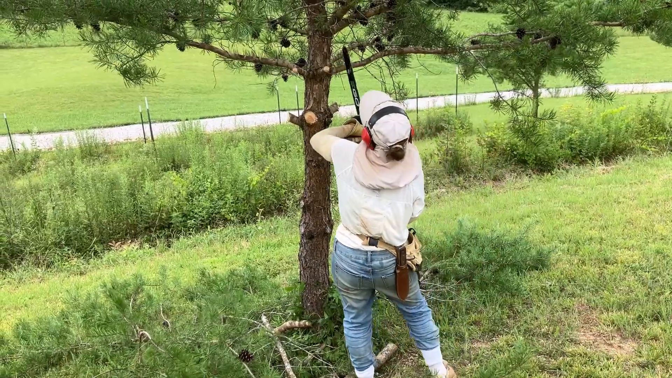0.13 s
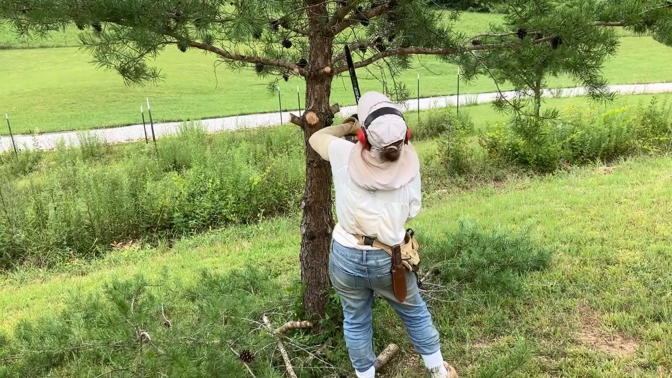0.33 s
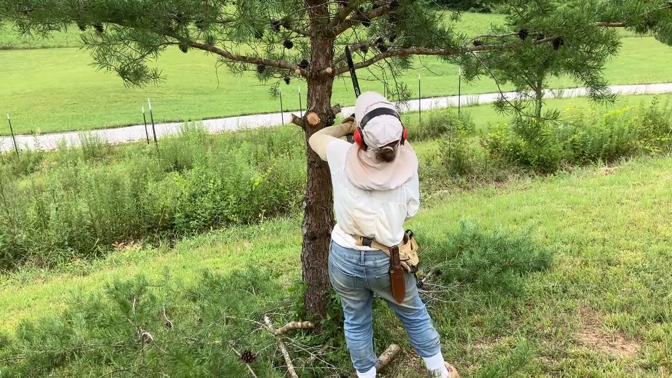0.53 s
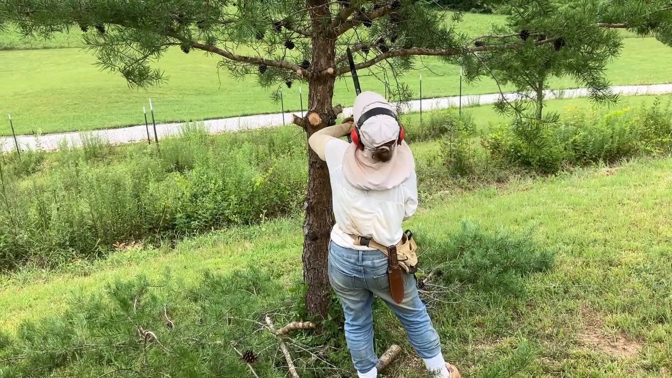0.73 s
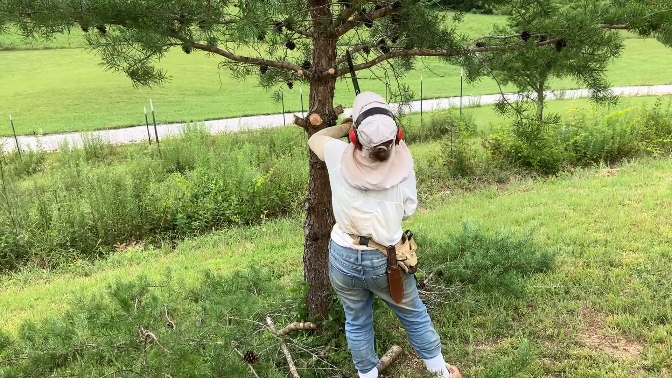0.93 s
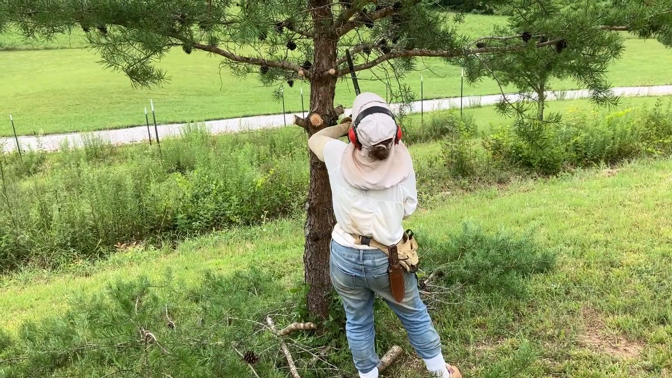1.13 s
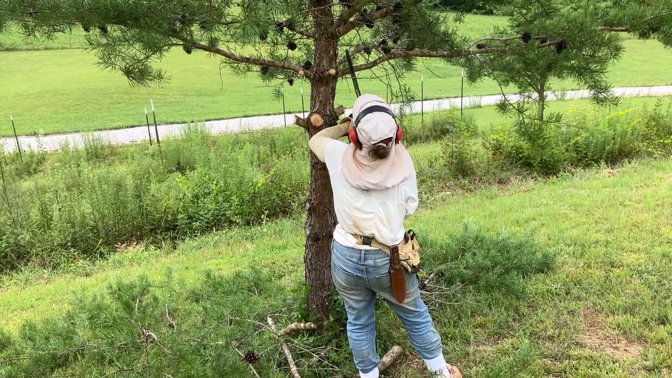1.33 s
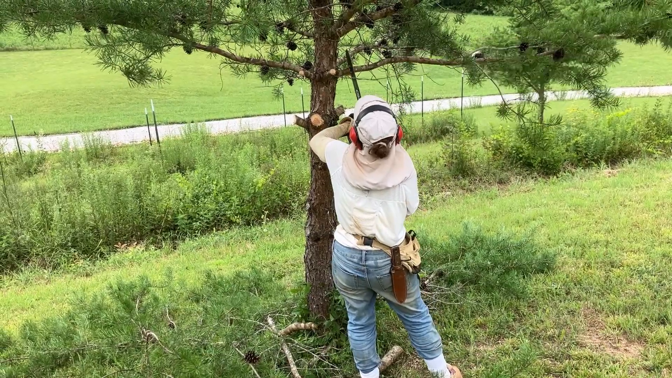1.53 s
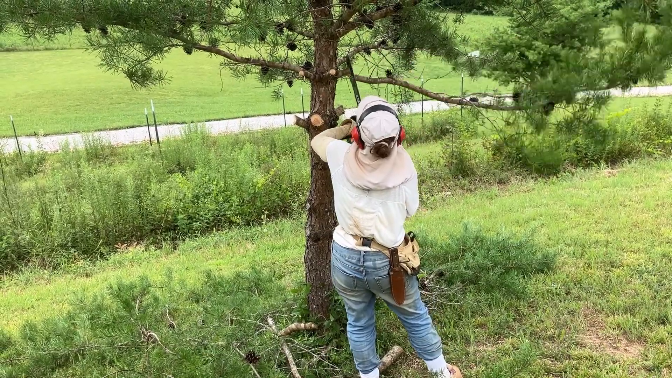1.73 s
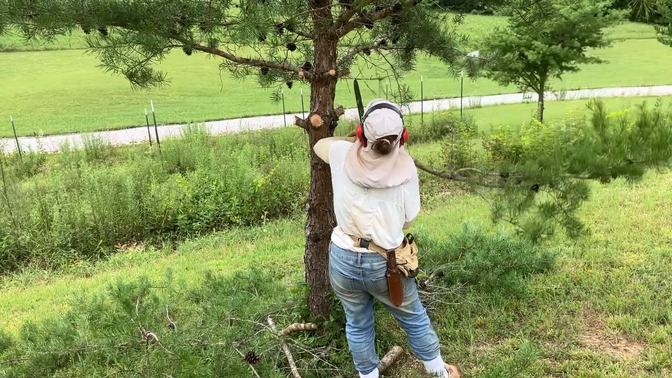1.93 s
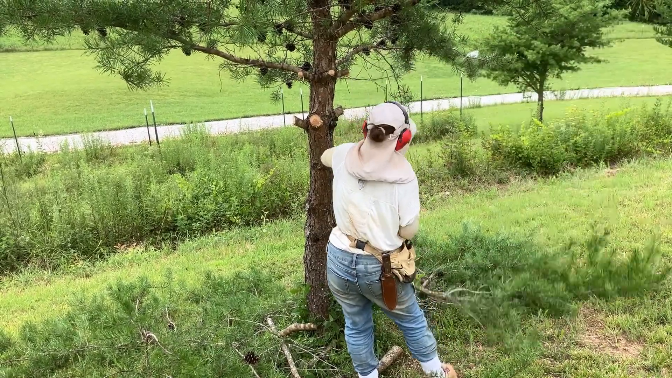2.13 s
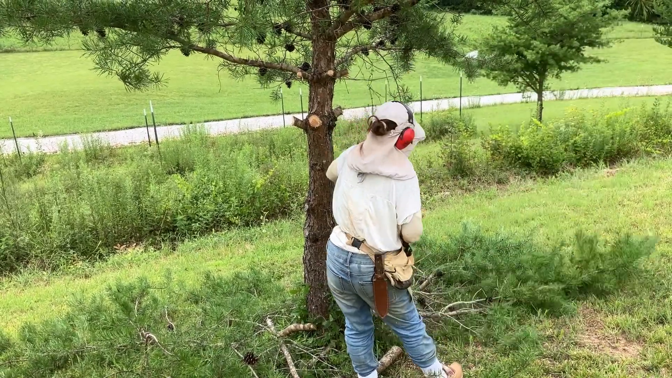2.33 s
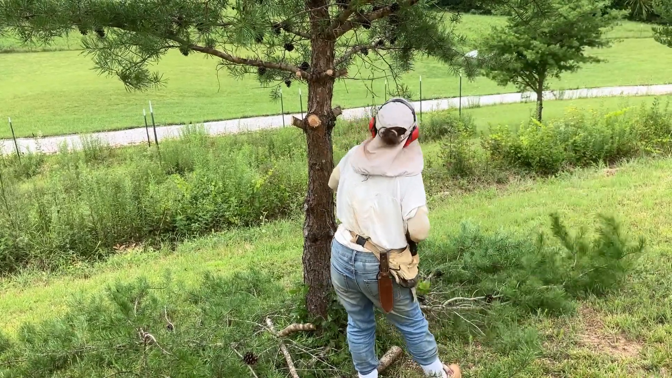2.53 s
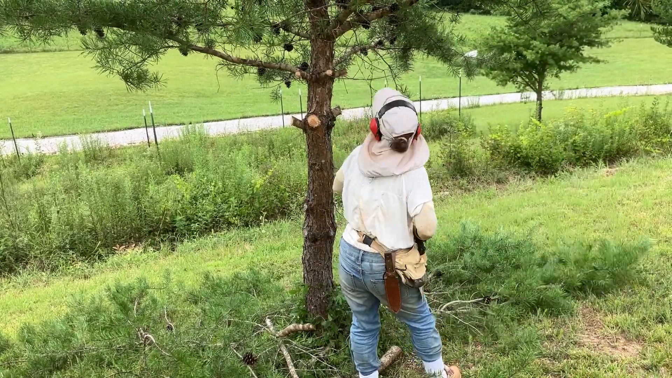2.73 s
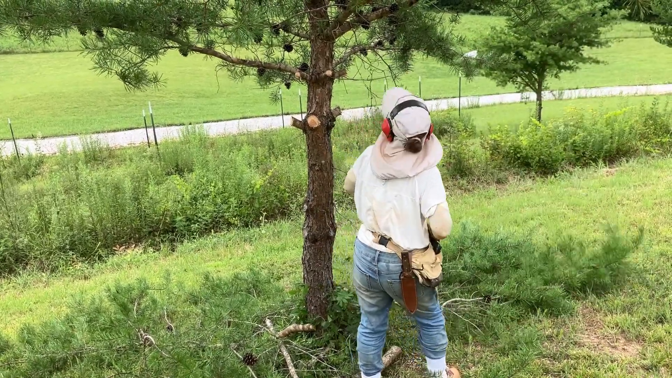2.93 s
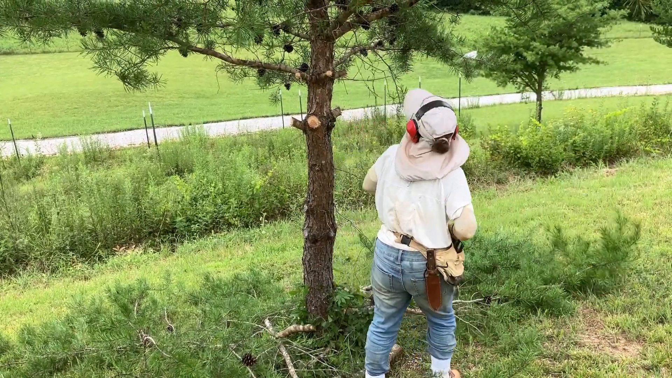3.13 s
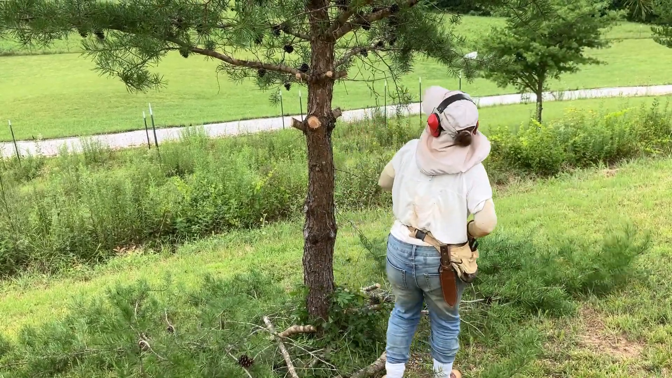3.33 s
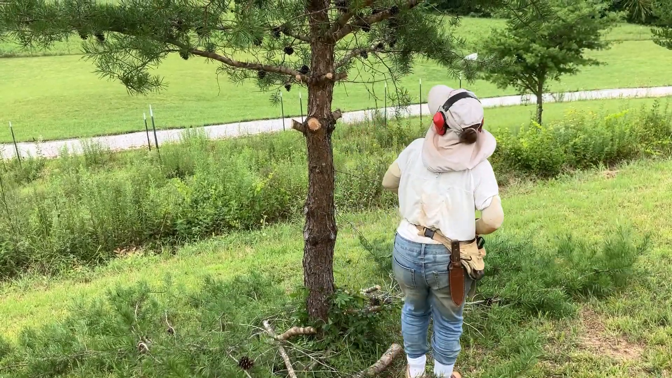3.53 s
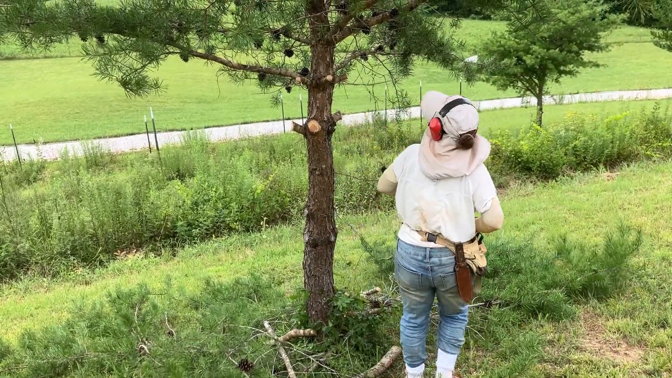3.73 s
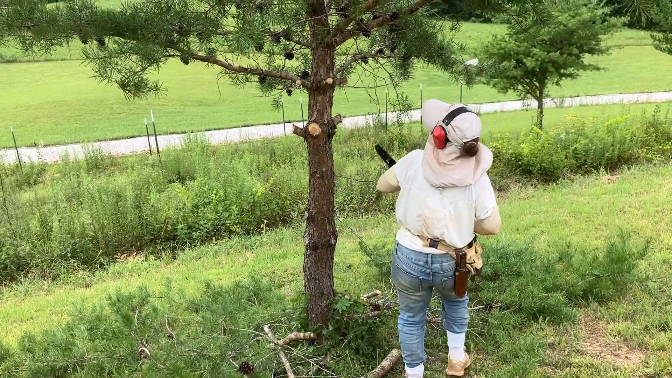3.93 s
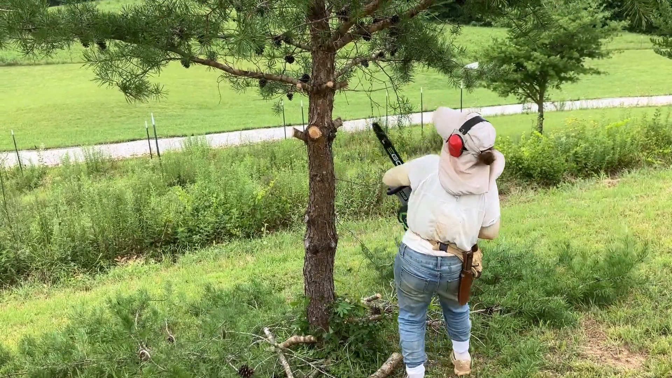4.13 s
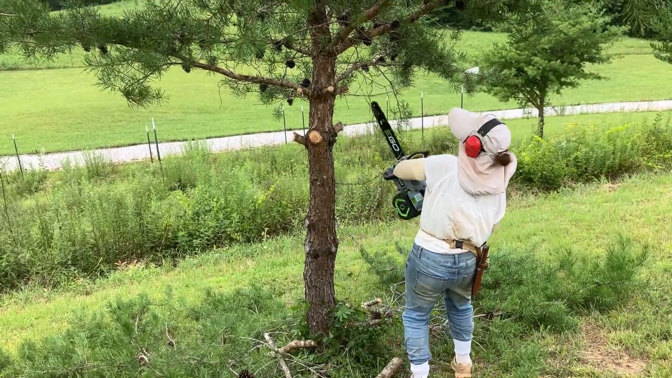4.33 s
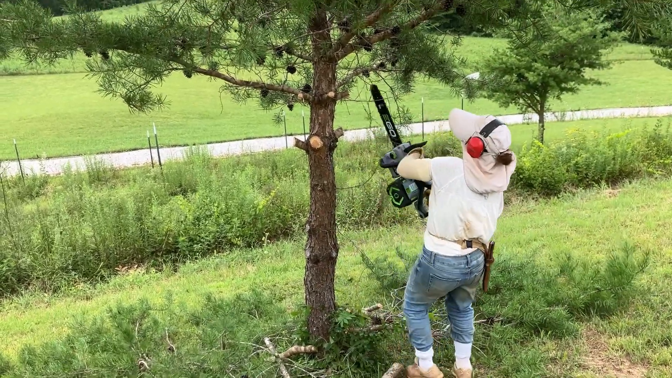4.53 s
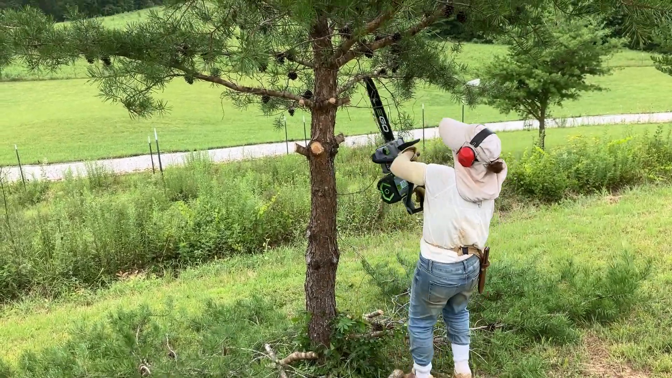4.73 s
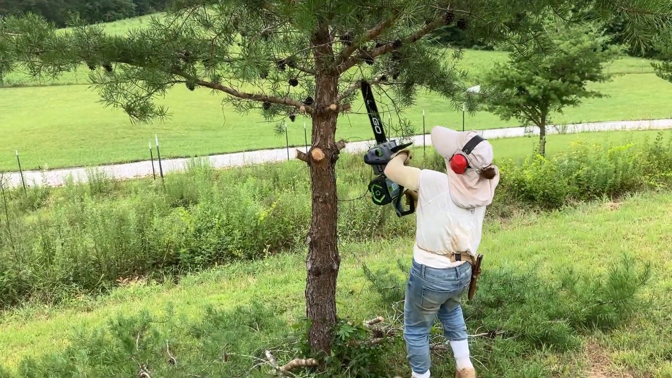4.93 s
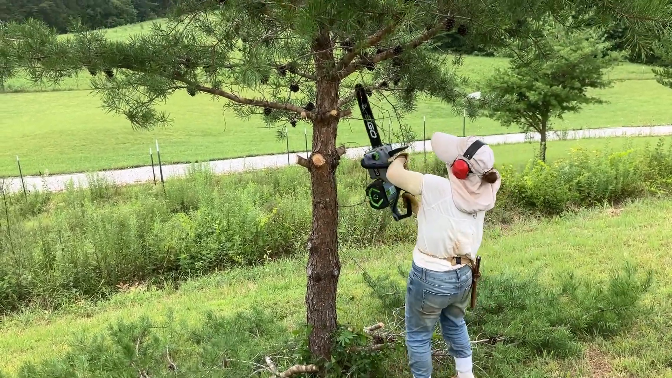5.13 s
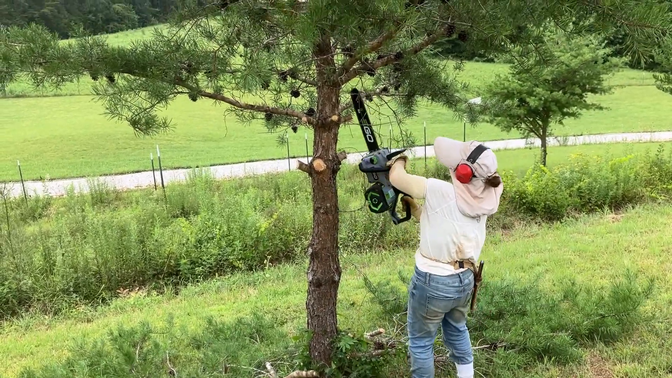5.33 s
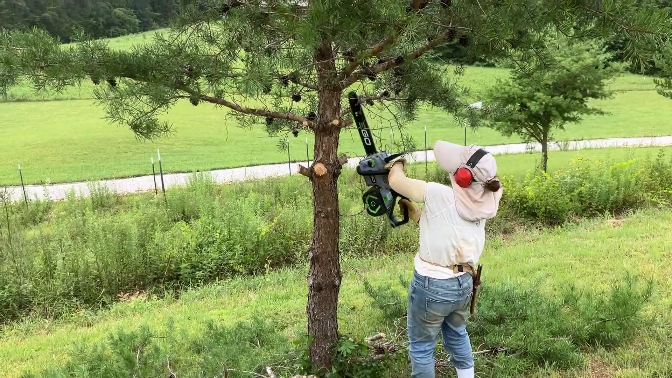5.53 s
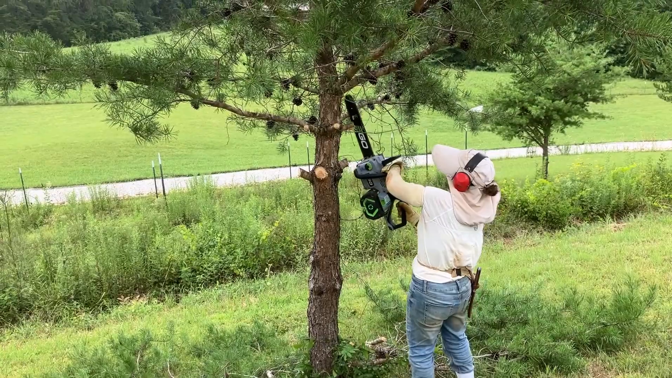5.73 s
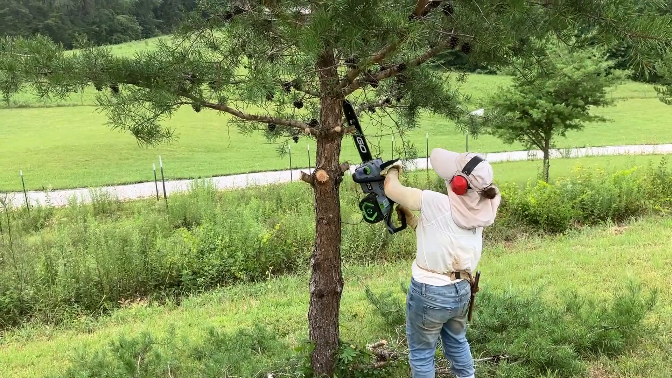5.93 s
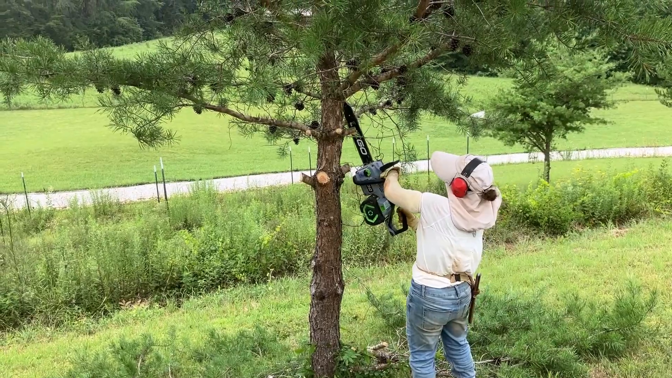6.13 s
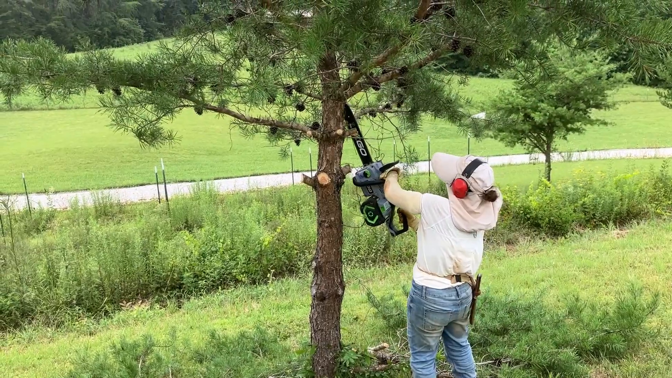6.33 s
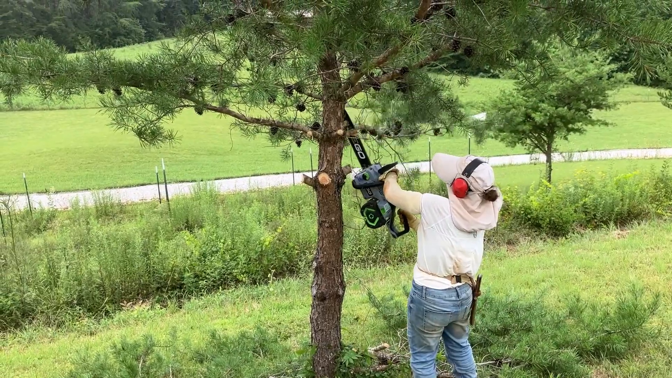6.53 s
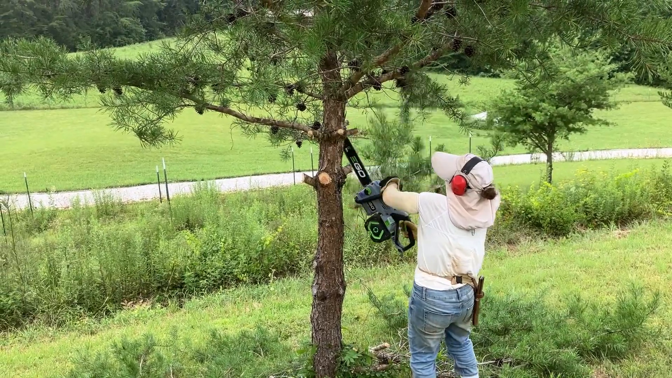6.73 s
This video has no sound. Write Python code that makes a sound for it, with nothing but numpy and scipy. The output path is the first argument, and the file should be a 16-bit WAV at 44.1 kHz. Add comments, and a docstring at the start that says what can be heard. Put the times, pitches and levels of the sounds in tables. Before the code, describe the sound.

Outdoors, an electric chainsaw runs up and cuts, stops abruptly; foliage crashes, twigs crack, the camera is bumped, then the saw whines again.

```python
"""In a quiet field a cordless chainsaw trims a small pine, a few metres from a hand-held camera.
The saw runs up, cuts a branch and brakes; the branch swishes into the grass, twigs snap, a second cut follows.
Chain links striking a six-tooth sprocket make the whine, in swept harmonics coloured by the housing; motor
and chain add other lines. Grains of noise pulsing with the sprocket make clatter, rasp and hiss. Shaped
noise makes air, foliage, twigs and echo; sinking sines make the bumps on the camera."""
import sys
import numpy as np
from scipy import signal
from scipy.fft import rfft, irfft
from scipy.io import wavfile

SR = 44100
rng = np.random.default_rng(int(sys.argv[2]) if len(sys.argv) > 2 else 0)


def digitize_waveform(pressure):
    """Quantize a signal to 16-bit integers and store it at the path in sys.argv[1].

    Rows of a 2-D input are taken as channels; values are limited to [-1, 1].
    """
    field = np.atleast_2d(pressure).T
    bounded = np.clip(field, -1, 1)
    quanta = np.round(bounded * 32767).astype(np.int16)
    wavfile.write(sys.argv[1], SR, quanta)


N = 298998
TIME = np.arange(N) / SR  # s
FREQS = np.fft.rfftfreq(N, 1 / SR)  # Hz

# Colour of the field's air. Each row: frequency in Hz, relative level in dB per Hz.
FIELD_COLOUR = [(18, -35.5), (30, -10.5), (270, -0.5), (432, -9.5), (673, -6.5), (1080, -18.5),
                (3070, -23.5), (5450, -34), (8060, -21), (9190, -21.5), (10700, -27.5), (13600, -33.5),
                (15500, -47.5)]
FIELD_DB = -66
# Colour of the grip rumble. Each row: frequency in Hz, relative level in dB per Hz.
RUMBLE_COLOUR = [(20, -22), (45, -1), (100, -5), (170, -18), (400, -35), (1500, -62)]
# The hand shifts its grip. Each row: peak time in s, rumble level in dB, rise in s, fade in s (both over 20 dB).
GRIP_SHIFTS = [(2.54, -45.5, .2, 0.37), (2.87, -51, 0.077, 0.15), (3.05, -54.5, .07, .17),
               (3.45, -49, 0.19, 0.2534), (3.99, -53.5, .07, 0.2), (4.18, -64, .07, 0.2),
               (4.42, -60.5, .06, .14), (4.69, -66, .1, 0.374)]
# Soft bumps on the camera. Each row: start in s, envelope peak in dB, starting pitch in Hz.
CAMERA_BUMPS = [(2.426, -40, 55), (2.495, -28.5, 176), (2.508, -29, 69.5), (2.514, -28.5, 148),
                (2.535, -26, 85.94), (2.592, -40, 554), (2.854, -43.5, 60), (2.878, -33.5, 188.5),
                (3.457, -35, 132.4), (3.569, -45, 90), (3.975, -48, 130)]
# Colour of brushing needles. Each row: frequency in Hz, relative level in dB per Hz.
NEEDLE_COLOUR = [(150, 21.5), (700, -33), (1500, -14), (3000, 5), (5500, 8.5), (8000, 12.5), (11000, 10),
                 (15500, 2.5)]
# Colour of dry sticks. Each row: frequency in Hz, relative level in dB per Hz.
STICK_COLOUR = [(200, -8.5), (700, 5), (1400, -5), (2600, 1.5), (5000, -23), (12000, -35)]
# Swishes of needles and grass, the first from the falling branch.
# Each row: peak time in s, relative level in dB, rise in s, fade in s (both over 20 dB).
FOLIAGE_SWISHES = [(2.275, -38, 0.043, 0.12), (2.35, -48.5, .04, 0.1), (2.5, -63.5, 0.1846, 1.3),
                   (2.968, -64, .01, 0.0597), (3.27, -61.5, .06, .3), (3.41, -59, 0.05685, 0.1754),
                   (3.55, -59.5, .1, 0.1108), (3.65, -64, .03, .11), (3.82, -62.5, 0.098, 0.3112),
                   (4.0, -66, .04, .06), (4.19, -68, 0.0209, 0.1), (4.33, -73, .08, 1),
                   (4.465, -63.5, .1, 0.2726), (4.6, -69, 0.2029, .6)]
# Snapping twigs. Each row: start in s, relative level in dB, weight of the woody knock in dB.
TWIG_SNAPS = [(2.2358, -29, -17), (2.2644, -29, -17), (2.2734, -30, -22), (2.2824, -27, -16),
              (2.3344, -29, -6), (2.3466, -32, -14), (2.823, -39.5, -18), (2.9644, -57.5, -15),
              (3.3319, -37.5, 0), (3.4121, -48, -11), (3.5225, -42, 0), (3.5697, -38.5, -20),
              (3.6232, -45, -20), (3.6358, -30.5, -5.5), (4.1854, -52.5, 10), (4.2264, -41, -22),
              (4.3294, -59.5, 13), (4.4667, -35, -6), (4.5373, -50.5, 9)]

# The bar scraping the kerf as the branch sags. Each row: time in s, level in dB.
SCRAPE_LEVEL = [(1.581, -57.5), (1.609, -30.5), (1.7, -31), (1.78, -38.5), (1.82, -56)]
# Resonances of that scrape. Each row: frequency in Hz, relative level in dB per Hz.
KERF_COLOUR = [(2500, -23.5), (3300, -12), (3700, -7.5), (4100, -6), (4600, -13), (6500, -30.5)]
# The chain taking up slack or catching in wood. Each row: start in s, relative level in dB, T60 in s.
CHAIN_JOLTS = [(1.093, -18.5, 0.09), (1.532, -17.5, 0.098), (1.685, -19.5, 0.16), (4.717, -26.5, 0.099),
               (4.765, -33, .05), (4.787, -28, 0.129)]

# How hard the cutters bite into wood. Each row: time in s, bite from 0 to 1.
BITE_CURVE = [(.9, 0), (1.1, .55), (1.4, 0.8), (1.7, .95), (1.85, .1), (2.1, 0), (4.75, 0.13), (5.05, 0.09),
              (5.75, 0.1), (6.05, 0.77), (6.45, 1), (6.78, .8)]
# Motor speed in each cut: run-up, sags as cutters catch, climbs as wood gives.
# Each row: time in s, sprocket turns per s.
SPEED_CURVE_1 = [(0, 42), (.06, 59), (.165, 102), (.21, 107), (.4, 109), (1.06, 109.6), (1.11, 107.5),
                 (1.2, 109.5), (1.45, 109.6), (1.6, 111.1), (1.69, 109), (1.86, 116), (1.99, 116),
                 (2.09, 100), (2.14, 60), (2.175, 47), (2.24, 20)]
SPEED_CURVE_2 = [(4.69, 15), (4.85, 57), (5.02, 126.5), (5.09, 132.1), (5.68, 132.2), (6.02, 137.4),
                 (6.11, 135.4), (6.2, 139.3), (6.32, 137.7), (6.45, 139.6), (6.58, 138), (6.66, 143.6),
                 (6.78, 143.8)]
# Weaker lines of motor and chain. Each row: multiple of sprocket speed, relative level in dB.
MOTOR_LINES_1 = [(2, -29.5), (3, -13.5), (5, -10), (7, -13.5), (8, -19), (9, -16.5), (11, -12), (13, -22.5),
                 (15, -14.5), (17, -21.5)]
MOTOR_LINES_2 = [(2, -20.5), (3, -21), (4, -14.5), (5, -6.5), (7, -31.5), (9, -17), (10, -9.5), (11, -12.5),
                 (14, -20.5), (23, -17), (37, -14.5), (42, -15.5), (60, -13.5)]
# Harmonics of the tooth rate, from the first up, in each cut.
# Each row: relative level in dB, drift in dB per s as the saw is tilted.
TOOTH_HARMONICS_1 = [(-31, 4), (-27, -3), (-40, 1), (-38, -4.5)]
TOOTH_HARMONICS_2 = [(-22.5, -0.3), (-28.5, -1.2), (-36, 1), (-40, 0.055)]
# How bar and housing radiate the whine towards the camera. Each row: frequency in Hz, gain in dB.
HOUSING_RADIATION_1 = [(190, -29.5), (270, -11), (340, -5.5), (420, -14.5), (560, -10), (650, -7.5),
                       (700, -1.5), (950, -8), (1130, -10.5), (1220, -2), (1300, 1), (1420, -2),
                       (1700, -13.5), (2080, -10.5), (2370, -20), (2600, -4), (2800, -11.5)]
HOUSING_RADIATION_2 = [(170, -50), (300, -13.5), (465, -17), (560, -8), (735, 2), (790, 2.5), (950, -5),
                       (1130, -7), (1350, 2), (1590, -11), (2240, -10), (2440, -21.5), (2580, -2.5),
                       (2950, -14), (3170, -2), (3320, -11), (3460, -4)]
# Clatter of bar and housing. Each row: frequency in Hz, relative level in dB per Hz.
CLATTER_COLOUR_1 = [(25, -29), (80, -13), (170, -20.5), (290, -2.5), (450, -8.5), (560, 2.5), (720, 1),
                    (950, -4), (1250, 2), (1520, -8), (1800, -3), (4000, -45.5)]
CLATTER_COLOUR_2 = [(25, -37.5), (90, -15), (175, -25.5), (260, -10.5), (350, -5.5), (450, -18), (700, 5),
                    (950, -3), (1300, 0.5), (1680, -13), (1850, -12), (4000, -19)]
# Rasp of the cutters. Each row: frequency in Hz, relative level in dB per Hz.
RASP_COLOUR_1 = [(2000, -8.5), (2300, 3.5), (2600, -1), (2800, -1.5), (3100, 0.5), (3500, -2.5),
                 (3800, -12), (4050, -16.5), (8000, -8)]
RASP_COLOUR_2 = [(1900, 7), (2200, -0.5), (2600, 10), (2850, 1.5), (3150, 9), (3400, -12), (3600, 1),
                 (3800, -23), (4100, -9), (8000, -21)]
# Hiss of the links. Each row: frequency in Hz, relative level in dB per Hz.
HISS_COLOUR_1 = [(2500, -30), (4100, -7.1), (4400, -9.8), (5000, -8.4), (6500, -11.4), (7400, -7.2),
                 (8400, 0.0), (9800, -2.4), (11400, -2.7), (13000, -4.2), (14900, -5.8)]
HISS_COLOUR_2 = [(2500, -30), (4100, -3.3), (4400, -6.0), (5000, -2.6), (6500, -5.7), (7400, -5.1),
                 (8400, 0.0), (9800, -2.1), (11400, -0.9), (13000, -3.3), (14900, -3.7)]

# Likeness of the two microphone ports. Each row: frequency in Hz, likeness from 0 to 1.
PORT_LIKENESS = [(100, 0.71), (700, 0.71), (1800, 0.92), (3000, 0.2), (5000, 0.64), (7000, 0.24),
                 (9000, 0.95), (11000, 1), (15000, 0.76)]
# Phase lead of the left port. Each row: frequency in Hz, lead in radians.
PORT_LEAD = [(0, 0), (2000, .1), (2800, 1.5), (3400, .9), (4000, 1.3), (4700, 2.4), (6100, 2.2), (6700, .1),
             (9100, -3.1), (15800, -12.7)]
EDGE_HZ = 15900  # upper limit of the camera's sound

TEETH, LAP = 6, 8  # sprocket teeth; sprocket turns in one lap of the chain
FULL_SPEED = 120  # sprocket turns per s at which the speed laws give no gain
RUN_1, RUN_2 = (-.05, 2.143), (4.728, 6.9)  # the chain runs from, to, in s
ATTACK_DB_PER_S, RELEASE_DB_PER_S = 850, 338
# How each layer grows: dB per doubling of speed, dB at full bite.
CLATTER_LAW, RASP_LAW, HISS_LAW = (1.6, 3.1), (4.8, 2.7), (7.1, 0.76)
WHINE_LAW, HUM_LAW = (3.3, -0.91), (16.7, 0)
# Bands in Hz over which clatter, rasp and hiss are levelled.
LOW_BAND, RASP_BAND, HISS_BAND = (850, 1150), (1700, 4000), (7000, 15500)
SLACK_SHIMMER = .15  # scales how much a slow, slack chain makes the whine waver


def gain_of(db):
    """Decibels to linear gain."""
    return 10 ** (np.asarray(db) / 20)


def evened(x):
    """Scales a signal to unit RMS."""
    return x / np.sqrt(np.mean(x ** 2) + 1e-20)


def read(points):
    """A table over frequency, joined on a log axis."""
    f, value = np.transpose(points)
    return np.interp(np.log(FREQS + 1), np.log(f + 1), value)


def level(s, db):
    """A level curve as a gain, all but silent outside its span."""
    return gain_of(np.interp(TIME, s, db, left=-150, right=-150))


def swells(rows):
    """A gain that rises to each row's peak and fades again; overlapping swells add in power."""
    power = 0
    for s, db, rise, fade in rows:
        fall_db = 20 * np.maximum((s - TIME) / rise, (TIME - s) / fade)
        power = power + gain_of(db - fall_db) ** 2
    return np.sqrt(power)


def add(mix, s, sound):
    """Lays a sound into the mix from s seconds."""
    part = mix[round(s * SR):][:len(sound)]
    part += sound[:len(part)]


def wander(hz):
    """Slow random drift of unit RMS, up to about hz."""
    return evened(irfft(rfft(rng.standard_normal(N)) / (1 + (FREQS / hz) ** 4), N))


def grains(per_s, spread_db):
    """Two trains of tiny impacts of uneven size, at unit RMS."""
    size = gain_of(spread_db * np.minimum(rng.exponential(1, (2, N)), 4))
    hits = rng.standard_normal((2, N)) * (rng.random((2, N)) < per_s / SR)
    return evened(size * hits)


def colour(x, points, band=(0, SR)):
    """Filters x so that white noise of unit RMS has unit RMS inside the band."""
    gain = gain_of(read(points))
    inside = (FREQS >= band[0]) & (FREQS <= band[1])
    return irfft(rfft(x) * gain / np.sqrt(np.mean(gain ** 2 * inside)), N)


def ports(pair):
    """The first signal reaches both ports with a lag; the second is the scattered part in which they differ."""
    same = np.clip(read(PORT_LIKENESS), 0, 1)
    direct, scattered = rfft(pair) * np.sqrt([(1 + same) / 2, (1 - same) / 2])
    lead = np.exp(1j * np.interp(FREQS, *np.transpose(PORT_LEAD)))
    left, right = direct + scattered, (direct - scattered) / lead
    return irfft(np.array([left, right]), N)


def pan(x, left_db):
    """One signal on both ports, the left louder by left_db."""
    return x * gain_of([[left_db / 2], [-left_db / 2]])


def field():
    """Still air as steady coloured noise, swelling a little."""
    air = ports(colour(rng.standard_normal((2, N)), FIELD_COLOUR))
    return air * gain_of(FIELD_DB + 0.3 * wander(1.5))


def echo(x):
    """The far trees return a faint, dull wash of the saw: a decaying noise tail."""
    t = TIME[:SR * 3 // 2]
    decay = gain_of(-43 - 60 * t / 2.2)  # T60 of 2.2 s
    tail = rng.standard_normal((2, len(t))) * decay * (t > .06) / np.sqrt(SR / 9)
    wet = signal.fftconvolve(x, tail, axes=1)[:, :N]
    return colour(wet, [(200, -4), (700, -2), (1400, 0), (3000, -2), (9000, -15)], band=LOW_BAND)


def handling():
    """Fingers bump the camera: thuds that sink in pitch, over the low rumble of a shifting grip."""
    thuds, t = np.zeros(N), TIME[:SR // 6]
    for s, db, hz in CAMERA_BUMPS:
        age = t * hz / 0.41  # the envelope peaks at age 1
        sinking = np.sin(2 * np.pi * 3 * np.log1p(t * hz / 3))
        add(thuds, s, gain_of(db) * age * np.exp(1 - age) * sinking)
    grip = colour(rng.standard_normal((2, N)), RUMBLE_COLOUR) * swells(GRIP_SHIFTS)
    return thuds + ports(grip)


def foliage():
    """The cut branch lands in the grass; needles brush and crackle underfoot, and dry sticks shift in clumps."""
    needles = colour(grains(9000, 3.3), NEEDLE_COLOUR) * gain_of(0.5)
    clumps = evened(gain_of(4 * wander(30)))
    sticks = colour(grains(2500, 2.5) * clumps, STICK_COLOUR) * gain_of(-9.0)
    return ports((needles + sticks) * swells(FOLIAGE_SWISHES))


def twigs():
    """Each twig is a sharp noise snap and a short woody knock, with a faint scatter from the ground."""
    snap, knock, t = np.zeros(N), np.zeros(N), TIME[:SR // 8]
    crack = np.exp(-t / .001) + .06 * np.exp(-t / .02)
    for s, db, wood_db in TWIG_SNAPS:
        snap_noise, knock_noise = rng.standard_normal((2, len(t)))
        add(snap, s, gain_of(db - 6.5) * snap_noise * crack)
        add(knock, s, gain_of(db + wood_db - 17) * knock_noise * np.exp(-t / 0.00879))
    wood = colour(knock, [(200, -33), (700, -1.5), (1500, -1), (3000, -14), (9000, -37)])
    twig = snap + wood
    return ports(np.array([twig, np.roll(twig, SR // 400)]))  # scatter 2.5 ms later


def scrape():
    """Near the end of the first cut the wood pinches the running chain: dense grains through kerf resonances."""
    return ports(colour(grains(4400, 3.8), KERF_COLOUR) * level(*np.transpose(SCRAPE_LEVEL)))


def jolts():
    """The chain slaps the bar in short, decaying bursts of clatter."""
    force, t = np.zeros(N), TIME[:SR // 4]
    for s, db, t60 in CHAIN_JOLTS:
        add(force, s, gain_of(db - 5.5 - 60 * t / t60))
    return ports(colour(force * grains(6000, 0.99), CLATTER_COLOUR_1))


def bite():
    """How deep the cutters are in the wood, from 0 (running free) to 1."""
    return np.clip(np.interp(TIME, *np.transpose(BITE_CURVE)), 0, 1)


def speed_of(table):
    """Sprocket turns per second at every moment."""
    return np.interp(TIME, *np.transpose(table))


def shaft(speed, flutter):
    """Turns of the sprocket so far: its speed, with a small random flutter, summed over time."""
    return np.cumsum(speed * (1 + flutter * wander(35))) / SR


def drive(speed, run, law):
    """Gain of a layer of the saw: it follows speed and bite, and falls away outside the chain's run."""
    (start, stop), (doubling_db, bite_db) = run, law
    before_db = ATTACK_DB_PER_S * np.maximum(start - TIME, 0)
    after_db = RELEASE_DB_PER_S * np.maximum(TIME - stop, 0)
    growth_db = doubling_db * np.log2(speed / FULL_SPEED) + bite_db * bite()
    return gain_of(growth_db - before_db - after_db)


def hum(speed, run, turns, orders, lines_db, rough):
    """Unevenness in motor and chain adds lines on other multiples near full speed; wood damps the high ones."""
    lines, damping_db = np.zeros(N), 4 * bite()
    for order, db in orders:
        waver = rough * min(order / TEETH, 1 + order / 150)  # low lines are steadier
        tone = np.sin(2 * np.pi * order * turns + waver * wander(4))
        line = tone * (1 + waver * wander(25))
        lines += gain_of(db - damping_db * (order > TEETH)) * line
    return np.sqrt(2) * gain_of(lines_db) * drive(speed, run, HUM_LAW) * lines


def link_pattern(turns):
    """Each link has its own tick, so part of the rattle comes round again with every lap of the chain."""
    pattern = rng.standard_normal(size=4096)
    return evened(np.interp(turns % LAP, np.linspace(0, LAP, len(pattern)), pattern))


def chain(speed, run, turns, body, cutters, links, clatter_db, rasp_db, hiss_db,
          beat, surge_db, repeat, chatter_db):
    """Links hit the bar in step with the sprocket: the housing clatters, the cutters rasp, the steel hisses."""
    angle = 2 * np.pi * turns
    strikes = (1 + beat * np.cos(TEETH * angle)) * gain_of(surge_db * wander(90))
    strikes = evened(strikes * (1 + 0.057 * np.cos(angle / LAP)))  # the chain is tighter once a lap
    chatter = gain_of(chatter_db * bite() * wander(39))  # cutters grab and let go
    ticks = repeat * np.array([link_pattern(turns), link_pattern(turns)])
    knocks, chips, fizz = grains(7000, 2), grains(9000, 2.2), grains(25000, 1.8)

    clatter = colour(strikes * knocks, body, band=LOW_BAND)
    clatter = clatter * gain_of(clatter_db) * drive(speed, run, CLATTER_LAW)
    rasp_colour = [(400, -53.5), (1300, -9.5)] + list(cutters)
    rasp = colour(strikes * evened(chips + ticks), rasp_colour, band=RASP_BAND)
    rasp = rasp * gain_of(rasp_db) * drive(speed, run, RASP_LAW)
    hiss = colour(strikes * evened(fizz + ticks), [(500, -48)] + list(links), band=HISS_BAND)
    hiss = hiss * gain_of(hiss_db) * drive(speed, run, HISS_LAW)
    return ports((clatter + rasp) * chatter + hiss)


def whine(speed, run, turns, harmonics, radiation, shimmer, blur):
    """Six links a turn strike the sprocket; harmonics sweep through housing resonances, the higher less steady."""
    hz, response_db = np.transpose(radiation)
    age, tone = np.clip(TIME, *run) - run[0], np.zeros(N)
    slack = SLACK_SHIMMER * np.maximum(1 - speed / FULL_SPEED, 0)
    for k, (db, drift_db) in enumerate(harmonics, 1):
        unsteady = shimmer + blur * (k - 1) + slack
        swing = 1 + unsteady * (wander(36) + 1j * wander(45))  # level and phase waver
        radiated_db = np.interp(np.log(k * TEETH * speed), np.log(hz), response_db)
        harmonic = (swing * np.exp(2j * np.pi * k * TEETH * turns)).real
        tone += gain_of(db + drift_db * age + radiated_db) * harmonic
    return np.sqrt(2) * tone * drive(speed, run, WHINE_LAW)


def saw():
    """Two cuts: the first with the saw half hidden behind its user, the second in the open, faster and clearer."""
    speed_1, speed_2 = speed_of(SPEED_CURVE_1), speed_of(SPEED_CURVE_2)
    turns_1, turns_2 = shaft(speed_1, flutter=0.0028), shaft(speed_2, flutter=0.00102)
    tones_1 = whine(speed_1, RUN_1, turns_1, TOOTH_HARMONICS_1, HOUSING_RADIATION_1,
                    shimmer=0.14, blur=0.033)
    tones_1 += hum(speed_1, RUN_1, turns_1, MOTOR_LINES_1, lines_db=-28.5, rough=0.48)
    tones_2 = whine(speed_2, RUN_2, turns_2, TOOTH_HARMONICS_2, HOUSING_RADIATION_2,
                    shimmer=0.029, blur=0.15)
    tones_2 += hum(speed_2, RUN_2, turns_2, MOTOR_LINES_2, lines_db=-33, rough=0.42)
    noise_1 = chain(speed_1, RUN_1, turns_1, CLATTER_COLOUR_1, RASP_COLOUR_1, HISS_COLOUR_1,
                    clatter_db=-42, rasp_db=-41.0, hiss_db=-25.0,
                    beat=0.18, surge_db=0.5, repeat=0.62, chatter_db=4.0)
    noise_2 = chain(speed_2, RUN_2, turns_2, CLATTER_COLOUR_2, RASP_COLOUR_2, HISS_COLOUR_2,
                    clatter_db=-41.5, rasp_db=-40.0, hiss_db=-28.5,
                    beat=0.26, surge_db=0.1, repeat=0.73, chatter_db=1.2)
    return pan(tones_1, left_db=2.9) + pan(tones_2, left_db=3.0) + noise_1 + noise_2


def scene():
    """The saw and its echo over foliage, twigs, handling and the quiet field."""
    cutting = saw() + jolts() + scrape()
    return cutting + echo(cutting) + foliage() + twigs() + handling() + field()


def record(dry):
    """The band limit of the camera: a steep low-pass."""
    lowpass = signal.firwin(511, EDGE_HZ, window=("kaiser", 9), fs=SR)
    return signal.oaconvolve(dry, lowpass[None], "same")


dry = scene()
out = record(dry)
digitize_waveform(out)
```